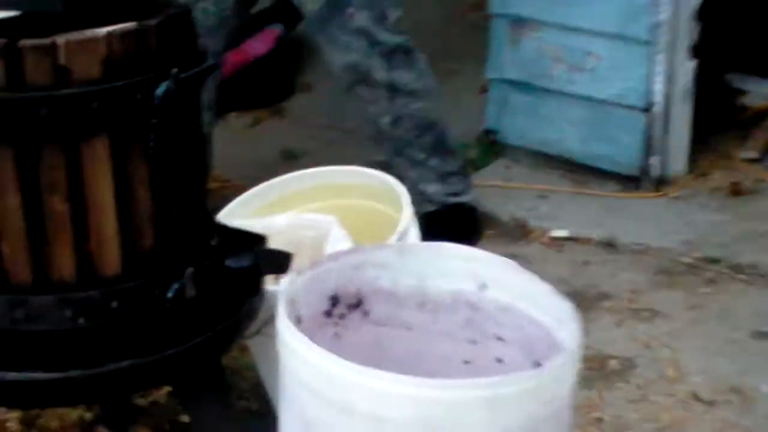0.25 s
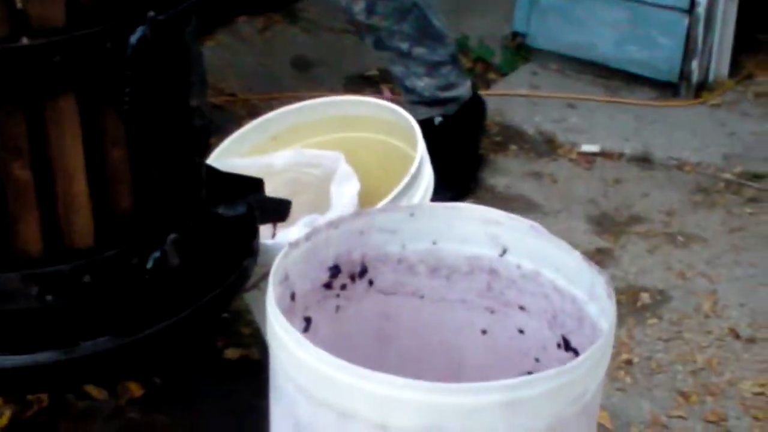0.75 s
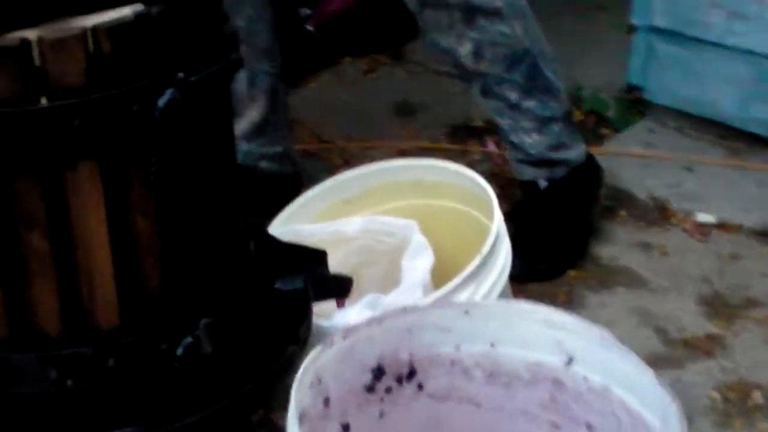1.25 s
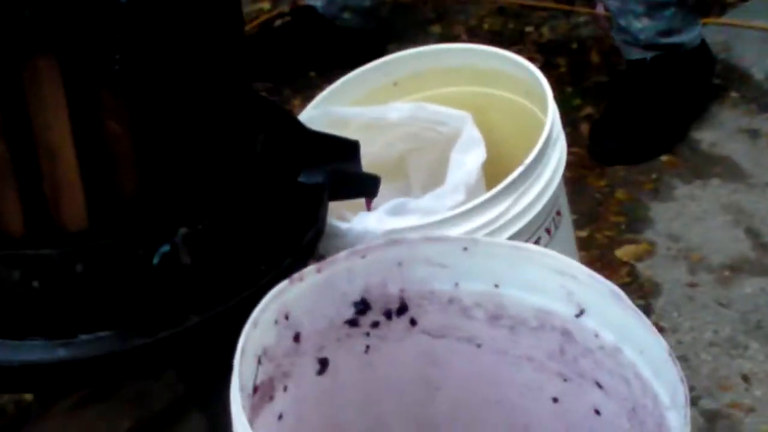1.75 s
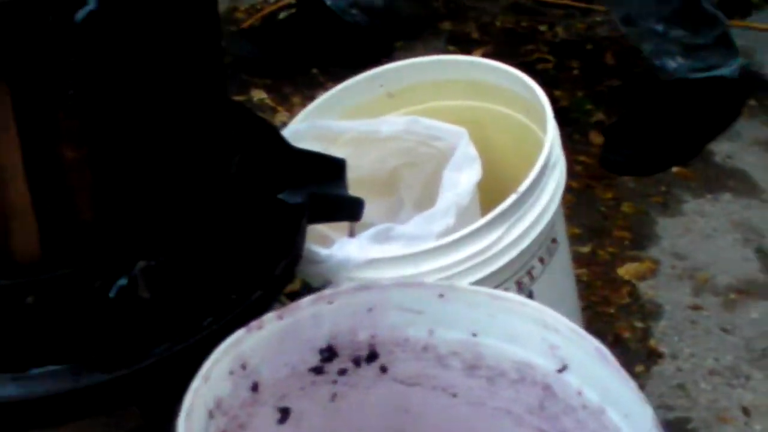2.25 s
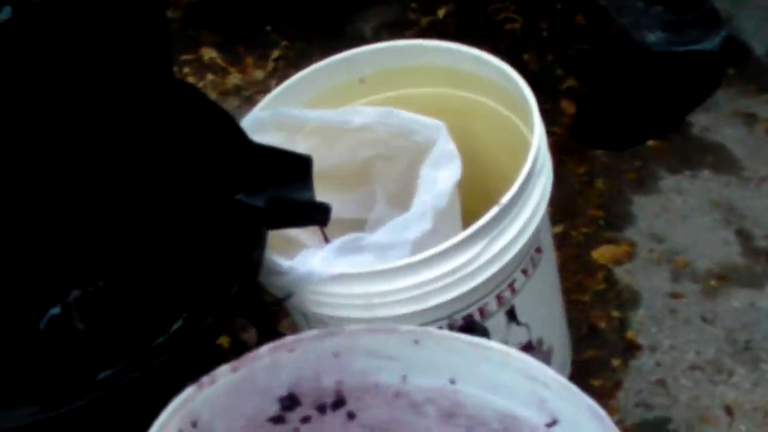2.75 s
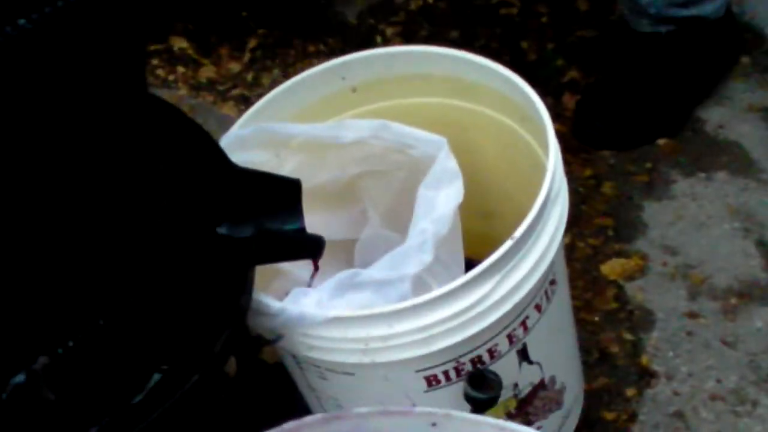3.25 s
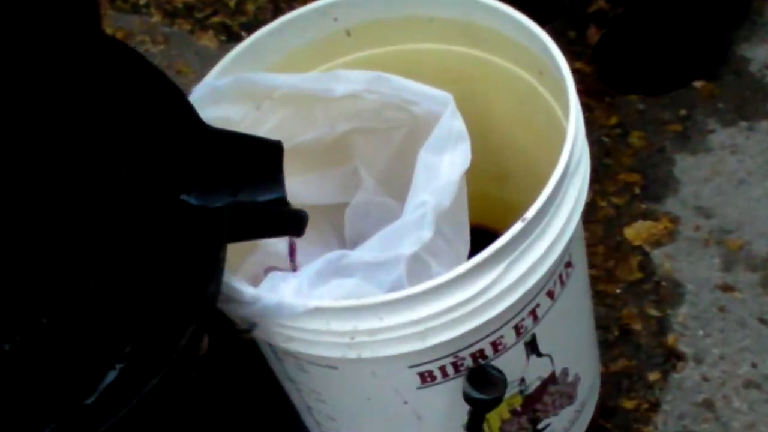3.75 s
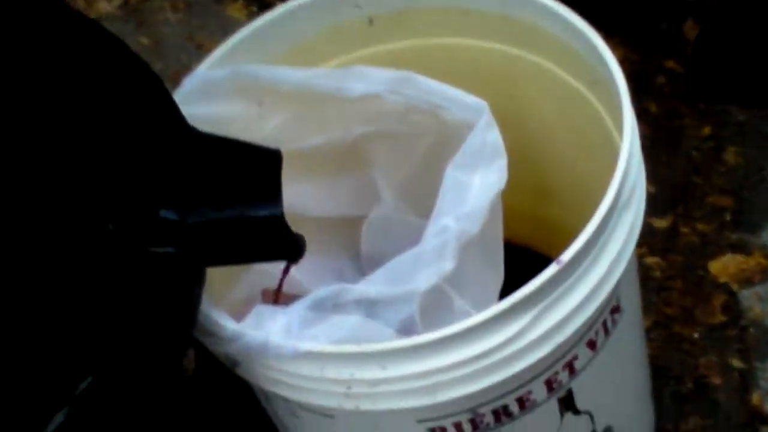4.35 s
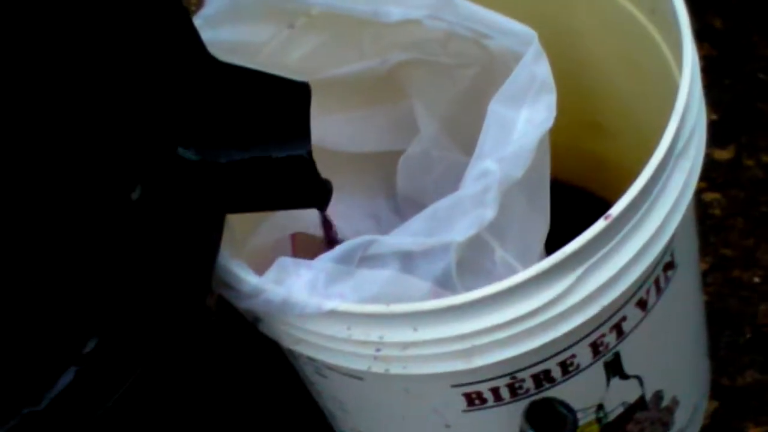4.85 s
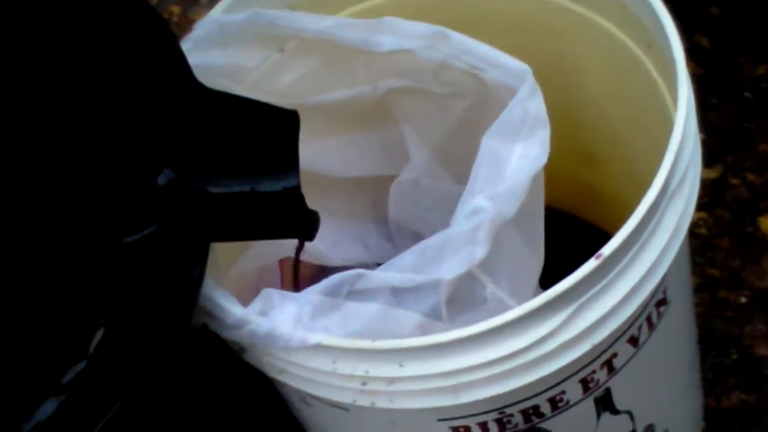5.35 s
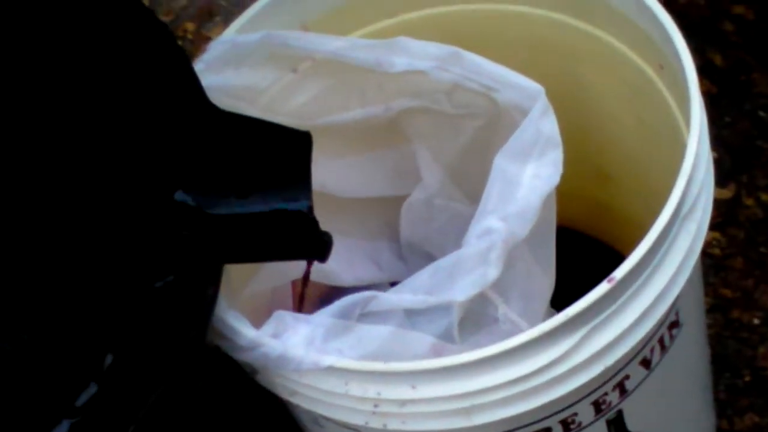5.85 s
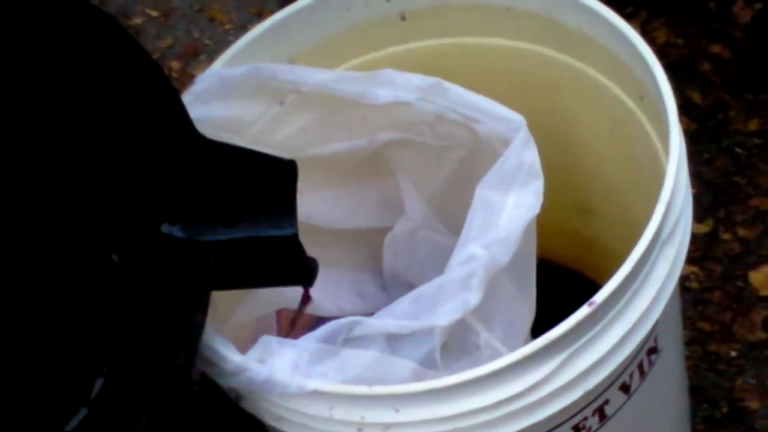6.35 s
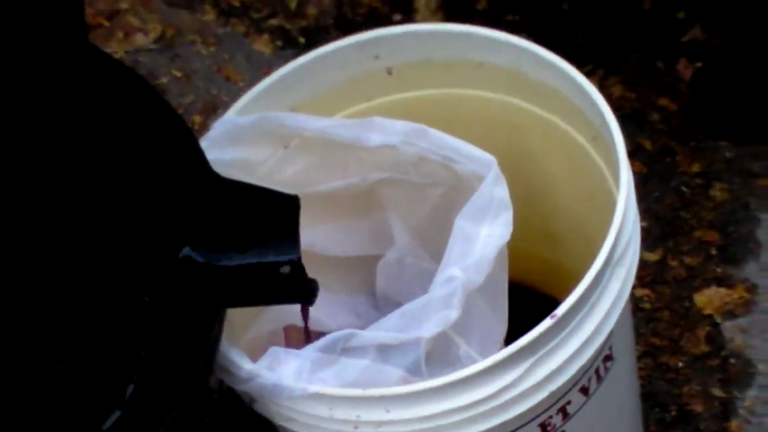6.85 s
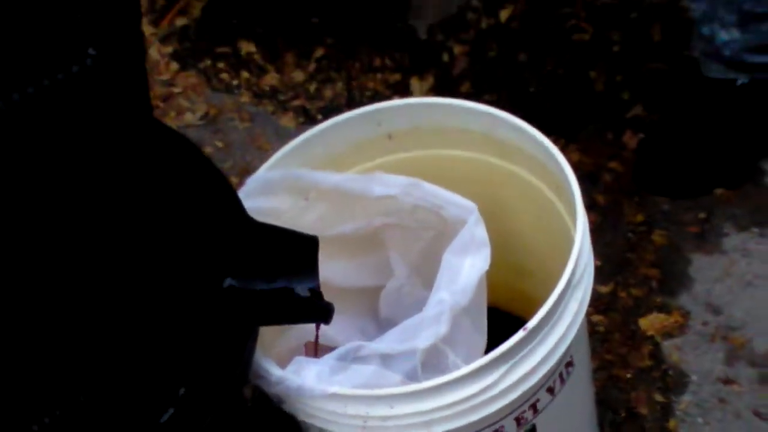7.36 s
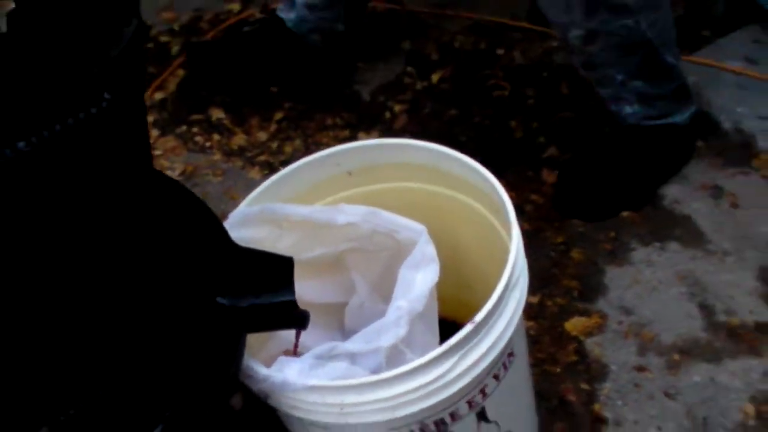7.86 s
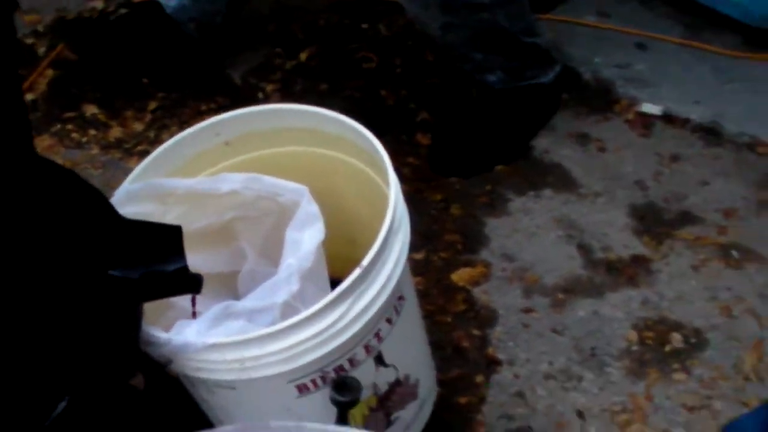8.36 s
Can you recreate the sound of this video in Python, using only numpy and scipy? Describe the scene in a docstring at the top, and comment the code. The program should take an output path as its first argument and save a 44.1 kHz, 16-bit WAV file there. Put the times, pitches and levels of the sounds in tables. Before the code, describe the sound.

Outdoors in a paved yard, a hand-cranked press gives irregular bright steel clinks and dull hollow wooden knocks. Juice plops faintly into a mesh bag in a bucket. Stiff cloth rustles and ticks very close to the microphone, with one long swish past the middle. A low engine drones over a soft distant murmur, dipping in pitch, recovering, then growing louder and sinking lower.

```python
"""An engine drones and a yard murmurs throughout; from the first second the steel pawls of a basket press
clink (noise bursts, decaying modes), its bar knocks the wooden tub, and juice plops and bubbles into a mesh bag
in a bucket (chirps, damped sines). Something crisp, like a nylon sleeve, rustles and ticks close by (noise).
The engine's pitch, from harmonics of one pulse rate, sags and recovers by 4 s, where the strongest clink falls;
then the engine swells and sinks, the cloth makes a long slide peaking near 6.2 s, and clinks go on to the end."""
import sys
import numpy as np
from scipy import signal
from scipy.fft import rfft, irfft, next_fast_len
from scipy.io import wavfile
from scipy.ndimage import uniform_filter1d, map_coordinates

SR = 44100
rng = np.random.default_rng(int(sys.argv[2]) if len(sys.argv) > 2 else 0)


def persist_wave(psi):
    """Save psi, clipped to +-1, as 16-bit WAV."""
    counts = np.round(np.clip(psi, -1, 1) * 32767).astype(np.int16)
    wavfile.write(sys.argv[1], SR, np.atleast_2d(counts).T)


N = 380141
TOP_HZ = 16000  # upper band limit


def amp(db):
    """Level to amplitude: 20 dB is a factor of ten."""
    return 10 ** (np.asarray(db) / 20)


def unit(x):
    """Energy normalisation: scaled to rms 1."""
    return x / np.sqrt(np.mean(x ** 2) + 1e-20)


def crest(x, size):
    """Short-time normalisation: the strongest stretch of size samples has rms 1."""
    power = uniform_filter1d(np.mean(x ** 2, axis=0), size)
    return x / np.sqrt(power.max())


def along(points, hz):
    """Logarithmic frequency scale: interpolation of (f/Hz, value) points."""
    f, v = np.transpose(points)
    return np.interp(np.log(hz + 1), np.log(f + 1), v)


def curves(rows):
    """Time envelopes: one value per sample for each column after t/s."""
    s, *columns = np.transpose(rows)
    return [np.interp(np.arange(N) / SR, s, column) for column in columns]


def wobble(rate):
    """Slow random modulation: a smooth curve through rate random knots a second."""
    knots = rng.standard_normal(int(N * rate / SR) + 4)
    return map_coordinates(knots, [np.arange(N) * rate / SR])


def fade(t, t60):
    """Exponential damping: a decay of 60 dB in t60 seconds."""
    return np.exp(-np.log(1000) * t / t60)


def bump(hz, centre_hz, width_hz):
    """Resonance: a peak of height 1 that halves at width_hz from its centre."""
    return 1 / (1 + ((hz - centre_hz) / width_hz) ** 2)


def colour(x, level_db):
    """Minimum-phase filtering: the folded cepstrum makes a causal filter of a gain curve in dB."""
    n = x.shape[-1]
    m = 2 * next_fast_len(n // 2 + 2048)
    cepstrum = irfft(np.log(amp(level_db(np.fft.rfftfreq(m, 1 / SR)))))
    cepstrum[1:m // 2] *= 2
    cepstrum[m // 2 + 1:] = 0
    return irfft(rfft(x, m) * np.exp(rfft(cepstrum)))[..., :n]


def stereo(pair, alike):
    """Interaural coherence: unrelated mid and side noises are mixed to a correlation set by frequency."""
    def angle(hz):
        return np.arccos(along(alike, hz)) / 2

    mid = colour(pair[0], lambda hz: 20 * np.log10(np.cos(angle(hz))))
    side = colour(pair[1], lambda hz: 20 * np.log10(np.sin(angle(hz))))
    return np.array([mid + side, mid - side])


def rush(pair, spectrum, alike):
    """Coloured noise: a pair of noises is spread, filtered and scaled to rms 1."""
    return unit(colour(stereo(pair, alike), lambda hz: along(spectrum, hz)))


def ring(modes, t, scatter_db, skew):
    """Modal superposition: damped modes of random strength, a little out of phase between channels."""
    out = np.zeros((2, len(t)))
    for hz, db, t60 in modes:
        phase = rng.uniform(0, 2 * np.pi) + skew * rng.standard_normal((2, 1))
        strength = amp(db + scatter_db * rng.standard_normal())
        out += strength * fade(t, t60) * np.sin(2 * np.pi * hz * t + phase)
    return out


def add(track, s, sound):
    """Linear superposition: mixes a sound in at s seconds."""
    room = track[:, max(round(s * SR), 0):][:, :sound.shape[1]]
    room += sound[:, :room.shape[1]]


def left_late(pair, delay_s):
    """Interaural time difference: a linear phase delays the left channel (negative: advances it)."""
    m = next_fast_len(N + SR // 2)
    shift = np.exp(-2j * np.pi * np.fft.rfftfreq(m, 1 / SR) * delay_s)
    left = irfft(rfft(pair[0], m) * shift, m)[:N]
    return np.array([left, pair[1]])


# stereo coherence of the press, echo, yard and engine rumble: [f/Hz, left-right correlation]
FAR_COHERENCE = [(200, 0.95), (500, 0.96), (1200, 0.88), (3000, 0.67), (6500, 0.65), (12000, 0.34)]
# slow course of the background: [t/s, relative level/dB]
MURMUR_LEVEL = [(0, -43.5), (0.8, -47.5), (1.9, -43.5), (3.5, -48), (6, -46), (8.62, -46)]
# background spectrum: [f/Hz, relative spectral density level/dB]
YARD_SPECTRUM = [(88, -22.5), (150, -3.5), (254, -9), (406, 5), (439, 0), (662, -3.5), (702, -0.5),
                 (998, -2.5), (1100, -7.5), (1340, -4.5), (2760, -11), (8900, -23.5), (9820, -78),
                 (16000, -107)]


def yard():
    """Incoherent summation: distant traffic merges into coloured noise of gently drifting level."""
    level = amp(curves(MURMUR_LEVEL)[0] + 1 + 2.5 * wobble(6))
    return level * rush(rng.standard_normal((2, N)), YARD_SPECTRUM, FAR_COHERENCE)


# exhaust pulse rate: [t/s, f/Hz]
PULSE_RATE = [(0.0, 30.3), (0.19, 28.9), (0.48, 28.2), (1.46, 28.37), (1.56, 27.71), (4.1, 29.8),
              (4.13, 30.03), (7.08, 25.74), (7.63, 24.9), (8.62, 24.35)]
# how strongly the engine carries, used as a deviation from its mean: [t/s, level/dB]
ENGINE_LOUDNESS = [(0, -50.5), (2.5, -49), (3.05, -41.5), (4.4, -44), (4.9, -35), (6.4, -35), (7.6, -34.5),
                   (8.62, -38.5)]
# exhaust harmonics: [multiple of the pulse rate, relative mean level/dB,
# level gained per dB of loudness/(dB/dB), level gained per Hz of pulse rate/(dB/Hz)]
EXHAUST_HARMONICS = [(2, -54.5, 0.1, 2.3), (3, -51, 1.56, 0.9), (4, -53, 1.0, 0), (5, -46.5, 1.0, 1.07),
                     (6, -59.5, -0.5, -3)]
# high tone of the engine: [t/s, relative level/dB]
WHINE_LEVEL = [(0, -71), (2, -64), (3.3, -51.5), (4.3, -51.5), (5.2, -51), (8.62, -61.5)]
# low engine noise: [f/Hz, relative spectral density level/dB]
RUMBLE_SPECTRUM = [(20, -37), (38, -27), (70, -3), (130, 6), (170, 0), (230, -15), (400, -37.5)]


def engine():
    """Harmonic series: exhaust tones and a whine share one pulse rate and waver in the air, over a rumble."""
    whine_order, whine_gain_db = 13, -1
    waver_db, waver_rate, drift_rad = 2.3, 5.5, 0.05  # rate in knots per second
    rate_hz = curves(PULSE_RATE)[0]
    loud_db = curves(ENGINE_LOUDNESS)[0]
    swell_db = loud_db - loud_db.mean()
    faster_hz = rate_hz - rate_hz.mean()
    phase = 2 * np.pi * np.cumsum(rate_hz) / SR + drift_rad * wobble(3.5)

    lines = [(whine_order, curves(WHINE_LEVEL)[0] + whine_gain_db)]
    for order, db, by_swell, by_rate in EXHAUST_HARMONICS:
        lines.append((order, db + by_swell * swell_db + by_rate * faster_hz))
    tones = np.zeros(N)
    for order, db in lines:
        strength = np.sqrt(2) * amp(db + waver_db * wobble(waver_rate))  # rms to peak of a sine
        tones += strength * np.sin(order * phase + rng.uniform(0, 2 * np.pi))

    noise = rush(rng.standard_normal((2, N)), RUMBLE_SPECTRUM, FAR_COHERENCE)
    return tones + amp(-51 + swell_db) * noise


# plops of the juice: [t/s, relative peak level/dB, starting f/Hz, t60/s]
JUICE_PLOPS = [(0.616, -37, 1676, 0.27), (1.088, -35, 1410, 0.47), (1.828, -32.5, 1410, 0.15),
               (1.947, -34, 1520, 0.042), (2.337, -35.5, 1440, 0.05), (4.664, -33, 1495, 0.063),
               (5.011, -31.5, 1760, 0.054), (6.384, -32.5, 1712, 0.038)]


def trickle():
    """Narrow-band modulation: a falling carrier blurred by slow noise makes each soft plop in the wet bag."""
    fall_per_s, blur_hz, gain_db = 15, 230, -1
    out, t = np.zeros((2, N)), np.arange(SR // 8) / SR
    for s, db, start_hz, t60 in JUICE_PLOPS:
        phase = 2 * np.pi * np.cumsum(start_hz * np.exp(-fall_per_s * t)) / SR
        noise = rng.standard_normal((2, len(t)))
        a, b = colour(noise, lambda hz: 20 * np.log10(bump(hz, 0, blur_hz)))
        plop = (a * np.cos(phase) + b * np.sin(phase)) * fade(t, t60)
        add(out, s, amp(db + gain_db) * crest(np.array([plop, plop]), size=256))
    return out


def bubbles(count, pitch_hz, spread, cycles, size_db, level_db):
    """Bubble resonance: damped sines at random moments, mostly weak, each ringing for a few cycles."""
    when, size = rng.random((2, count, 1))
    hz = pitch_hz * np.exp(spread * rng.standard_normal((count, 1)))
    hz = np.minimum(hz, TOP_HZ)
    t = np.arange(SR // 20) / SR
    age = t * hz / cycles
    strength = amp(-size_db * np.log(size + 0.1))
    envelope = np.exp(-age) * (1 - np.exp(-4 * age))
    rings = strength * envelope * np.sin(2 * np.pi * hz * t)
    where = (when * N).astype(int) + np.arange(len(t))
    track = np.bincount(where.ravel(), rings.ravel(), N)[:N]
    return amp(level_db) * unit(track)


def juice():
    """Air entrainment: plops, the bubbles they trap and fine, high spatter on the mesh."""
    trapped = bubbles(count=300, pitch_hz=1454, spread=0.092, cycles=9.1, size_db=5.5, level_db=-55.5)
    spatter = bubbles(count=320, pitch_hz=10300, spread=0.29, cycles=9.5, size_db=8, level_db=-67)
    return trickle() + trapped + spatter


# the unbroken slide of the cloth: [t/s, relative level/dB]
CLOTH_SLIDE = [(0, -51), (0.55, -57), (2.3, -46.5), (3.3, -47), (4.45, -54.5), (5.1, -45.5), (5.55, -38),
               (6.17, -26.5), (6.27, -27.5), (6.35, -60), (7.05, -37), (7.35, -39.5), (8.62, -50.5)]
# short strokes of the cloth: [t of the peak/s, length/s, relative peak level/dB]
CLOTH_STROKES = [(0.274, 0.2, -38.5), (0.69, 0.27, -45.5), (1.148, 0.35, -42.5), (1.568, 0.098, -29),
                 (1.976, 0.16, -47), (2.407, 0.34, -41.5), (2.63, 0.2, -32.5), (3.063, 0.092, -37),
                 (3.86, 0.17, -35.5), (4.118, 0.15, -31), (4.28, 0.096, -29), (4.575, 0.26, -38.5),
                 (5.347, 0.18, -33.5), (6.402, 0.13, -34), (6.54, 0.23, -29.5), (6.848, 0.26, -35),
                 (7.197, 0.19, -41), (7.477, 0.13, -29.5), (7.71, 0.18, -33), (8.188, 0.11, -34),
                 (8.342, 0.14, -32.5)]


def rubbing():
    """Power summation: a slow slide plus strokes that each swell and ebb."""
    rise, edge_db = 0.41, 15  # share of a stroke spent swelling; its ends lie this far under its peak
    power = amp(curves(CLOTH_SLIDE)[0]) ** 2
    for s, length, db in CLOTH_STROKES:
        u = (np.arange(N) / SR - s) / length
        drop_db = edge_db * np.maximum(-u / rise, u / (1 - rise))
        power = power + amp(db - drop_db) ** 2
    return np.sqrt(power)


def patchy(x, depth_db):
    """Spectral fluctuation: random patches of gain in time and frequency keep the colour shifting."""
    z = signal.stft(x, nperseg=256)[2]
    field = rng.standard_normal(z.shape[1:])
    field = uniform_filter1d(field, size=12, axis=0)
    field = uniform_filter1d(field, size=8, axis=1)
    return signal.istft(z * amp(depth_db * unit(field)), nperseg=256)[1][:, :N]


# stereo coherence of the nearby cloth: [f/Hz, left-right correlation]
NEAR_COHERENCE = [(300, 0.92), (1400, .88), (3100, 0.8), (6800, 0.55), (15000, 0.24)]
# hiss of the cloth: [f/Hz, relative spectral density level/dB]
CLOTH_SPECTRUM = [(300, -1), (1000, 2), (2500, 0.5), (4500, 3.5), (6300, 8), (7600, -3), (10500, 5.5),
                  (13000, 7), (16000, 0.5)]
# sharp ticks of the cloth: [t/s, relative peak level/dB]
CLOTH_TICKS = [(0.26, -30), (2.199, -25), (2.6198, -26), (2.7263, -25), (2.803, -25.5), (3.674, -28),
               (3.7618, -30.5), (4.103, -23), (4.125, -14.5), (4.1614, -27), (4.816, -33.5),
               (4.9671, -22.5), (5.2582, -24.5), (6.8205, -23)]
# one tick: [f/Hz, relative spectral density level/dB]
TICK_SPECTRUM = [(300, 0), (2500, -9), (6000, 1.5), (7600, -11), (11000, 3.5), (16000, 2)]


def sleeve():
    """Stick-slip friction: stiff cloth gives a hiss of fibres, many small snags and sharp ticks."""
    snags_per_s, snag_spread_db, snag_t60 = 320, 4.5, 0.0083
    small_ticks_per_s, small_tick_db, small_scatter_db = 3, -37, 3  # before the tick gain
    tick_t60, tick_gain_db = 0.013, 3
    level = rubbing() * amp(1 + 2 * wobble(60) + wobble(14))

    snag_strength = amp(snag_spread_db * np.minimum(rng.standard_normal(N), 2))
    snags = (rng.random(N) < snags_per_s / SR) * snag_strength
    t = np.arange(SR // 30) / SR
    grains = signal.fftconvolve(snags, fade(t, snag_t60))[:N]
    grain_noise = unit(grains * rng.standard_normal((2, N)))
    fibres = rng.standard_normal((2, N)) + amp(-2) * grain_noise
    out = level * rush(patchy(fibres, depth_db=2), CLOTH_SPECTRUM, NEAR_COHERENCE)

    ticks = list(CLOTH_TICKS)
    for _ in range(round(small_ticks_per_s * N / SR)):  # fainter ticks at random moments
        ticks.append((rng.random() * N / SR, small_tick_db + small_scatter_db * rng.standard_normal()))
    for s, db in ticks:
        noise = fade(t, tick_t60) * rng.standard_normal((2, len(t)))
        tick = rush(noise, TICK_SPECTRUM, NEAR_COHERENCE)
        add(out, s, amp(db + tick_gain_db) * crest(tick, size=64))
    return out * amp([[-1], [1]])  # left softer, right louder


# reverberation of the yard's walls: [f/Hz, t60/s]
ECHO_DECAY = [(200, 0.77), (400, 0.18), (2000, 0.19), (7000, 0.13), (14000, 0.19)]


def walls(x):
    """Diffuse reverberation: shed and paving answer after 5 ms with noise decaying by frequency."""
    hz, t, z = signal.stft(rng.standard_normal((2, SR // 2)), SR, nperseg=256)
    decay = fade(t, along(ECHO_DECAY, hz)[:, None])
    tail = signal.istft(z * decay, SR, nperseg=256)[1]
    tail = np.pad(stereo(tail, FAR_COHERENCE), ((0, 0), (SR // 200, 0)))
    tail = tail / np.linalg.norm(tail[0])
    return signal.fftconvolve(x.mean(axis=0)[None], tail, axes=1)[:, :N]


# the bar knocks the tub: [t/s, peak level/dB, treble shelf gain/dB, relative low ring level/dB]
BAR_KNOCKS = [(0.292, -22.5, -12, -16), (0.329, -33.5, -20, -27), (0.399, -34.5, 25, -16),
              (1.172, -19.5, 43, -27), (1.349, -22.5, -30, -13), (1.487, -29, -13, -13),
              (1.582, -13.5, 4, -17.5), (2.422, -24.5, 3, -17.5), (2.467, -29, 15, 0),
              (2.978, -29, -24, -12.5), (3.074, -25, 14, -7), (3.088, -19.5, 3, -21.5),
              (3.814, -23.5, -26, -27), (4.075, -21.5, -10, -8), (4.221, -29.5, 17, -11),
              (4.312, -22.5, 10, -13), (4.332, -21, 14, -12.5), (5.145, -28.5, -5, -15),
              (5.635, -26.5, -2, -18), (5.785, -21.5, 27, -12.5), (5.804, -21, -10, -37),
              (6.891, -20.5, 38, -21), (7.1, -18, -4, -30), (7.323, -18, 5, -9.5)]
# dull blow of the bar: [f/Hz, relative spectral density level/dB]
THUD_SPECTRUM = [(80, -18.5), (250, -4.5), (420, 5.5), (750, 2), (1100, -3), (1600, 0.5), (3000, -10),
                 (6500, -12.5), (9000, -33)]
# modes of the tub: [f/Hz, relative level/dB, t60/s]
TUB_MODES = [(178, -20.5, 0.35), (359, -9.5, 0.15), (388, -5.5, 0.14), (413.6, 8.5, 0.16),
             (437.4, 3.5, 0.099), (498, -15, 0.13), (668, -6, 0.18), (1023, -7.5, 0.16), (1435, -5, 0.079)]


def tub():
    """Impact excitation: the bar takes up its slack with a dull blow, and the loaded tub rings low."""
    crack_db, crack_t60, thud_t60 = 3, 0.014, 0.14
    ring_gain_db, ring_rise_s = 7, 0.0025
    out, t = np.zeros((2, N)), np.arange(SR // 3) / SR
    for s, db, treble_db, ring_db in BAR_KNOCKS:
        def blow_shape(hz):
            resonance_db = 5 * bump(hz, 690, width_hz=33)
            return along(THUD_SPECTRUM, hz) + resonance_db + treble_db * hz / (hz + 1500)

        blow = amp(crack_db) * fade(t, crack_t60) + fade(t, thud_t60)
        burst = stereo(blow * rng.standard_normal((2, len(t))), FAR_COHERENCE)
        burst = crest(colour(burst, blow_shape), size=256)
        onset = 1 - np.exp(-t / ring_rise_s)
        wood = amp(ring_gain_db + ring_db) * ring(TUB_MODES, t, scatter_db=5.5, skew=0.058) * onset
        add(out, s, amp(db) * crest(burst + wood, size=256))
    return out


# ratchet pawls: [t/s, peak level/dB, ring f/Hz, clatter level relative to the first contact/dB]
PAWL_CLINKS = [(0.1555, -24, 2500, 5), (0.2832, -25.5, 6170, -5), (0.5502, -32.5, 3570, -12),
               (1.151, -36, 4770, 2), (1.1633, -20.5, 2490, -3), (1.1712, -15.5, 4060, -28),
               (1.4635, -29.5, 2280, -12), (1.5718, -15, 3800, -5.5), (1.9449, -24, 4200, -25),
               (2.4349, -21.5, 2770, -12), (2.4649, -14, 6140, 20), (2.9331, -16.5, 2500, -17),
               (3.038, -36, 2190, 1), (3.0519, -24, 6240, 11), (3.0656, -22.5, 1820, -4),
               (3.1607, -34.5, 2680, 2), (3.3274, -25.5, 3060, -6.5), (4.2744, -3.5, 6330, -25),
               (4.6617, -21, 3560, -18), (4.9033, -34.5, 5660, 0),  (5.18, -10.5, 4640, -19),
               (5.188, -11, 4740, -8), (5.6131, -17, 2510, -24), (6.8902, -13, 2530, 9.5),
               (7.2084, -20.5, 3500, -1), (7.2195, -17.5, 2400, 14), (7.2514, -18.5, 3630, -12),
               (8.337, -10.5, 5240, -5.5)]
# hard contact of a pawl: [f/Hz, relative spectral density level/dB]
CLANK_SPECTRUM = [(150, -42), (400, -3), (1000, -7.5), (2500, -5), (5000, -2), (6500, -2), (7600, -17.5),
                  (10000, -13.5), (15500, -25.5)]
# modes of the steel head: [f/Hz, relative level/dB, t60/s]
STEEL_MODES = [(1920, -3.5, 0.15), (2524, 10, 0.046), (3101, -3.5, 0.15), (3774, 3, 0.13),
               (4005, 4.5, 0.16), (4900, -8, 0.062), (4665, 10, 0.055), (6328, 7.5, 0.084)]


def pawls():
    """Impact and modal decay: a pawl drops with a hard crack, chatters in its slot and rings the steel head."""
    crack_t60, clatter_t60, note_t60 = 0.0044, 0.13, 0.06
    bounce_db, steel_db, note_db = 3.5, -19, -11
    out, t = np.zeros((2, N)), np.arange(SR // 3) / SR
    knots = t[::90]  # chatter strength changes about every 2 ms
    for s, db, ring_hz, clatter_db in PAWL_CLINKS:
        def contact_shape(hz):
            return along(CLANK_SPECTRUM, hz) + 9 * bump(hz, ring_hz, width_hz=330)

        bounces = amp(bounce_db * np.interp(t, knots, rng.standard_normal(len(knots))))
        clatter = amp(clatter_db) * bounces * fade(t, clatter_t60)
        contact = fade(t, crack_t60) + clatter
        burst = stereo(contact * rng.standard_normal((2, len(t))), FAR_COHERENCE)
        burst = crest(colour(burst, contact_shape), size=128)
        steel = amp(steel_db) * ring(STEEL_MODES, t, scatter_db=1.5, skew=0.66)
        # each landing has a note of its own, a cluster of close modes, clearest without chatter
        cluster = [(ring_hz * (1 + 0.015 * k), note_db - 7 * abs(k), note_t60) for k in (-1, 0, 1)]
        note = ring(cluster, t, scatter_db=4, skew=0.16) / (1 + amp(clatter_db))
        add(out, s, amp(db) * crest(burst + steel + note, size=128))
    return out


def scene():
    """Superposition and lateralisation: all sources add, the right channel 2 dB above the left."""
    press = left_late(pawls() + tub(), -0.000012)  # left hears the press sooner
    cloth = left_late(sleeve(), 0.000025)  # left hears the cloth later
    mix = yard() + engine() + juice() + cloth + amp(-8.5) * walls(press) + press
    return mix * amp([[-1], [1]])


def record(dry):
    """Peak limiting and band limiting: clips at full scale, then removes everything from TOP_HZ up."""
    m = next_fast_len(N + SR // 2)
    spectrum = rfft(np.clip(dry, -1, 1), m)
    passband = np.fft.rfftfreq(m, 1 / SR) < TOP_HZ
    return irfft(spectrum * passband, m)[:, :N]


dry = scene()
out = record(dry)
persist_wave(out)
```